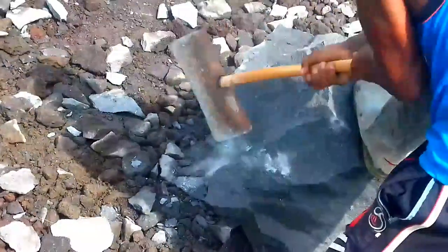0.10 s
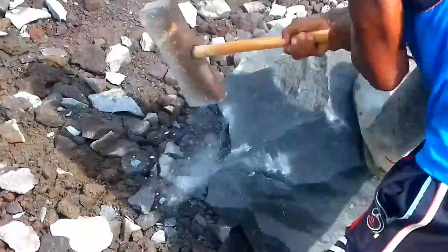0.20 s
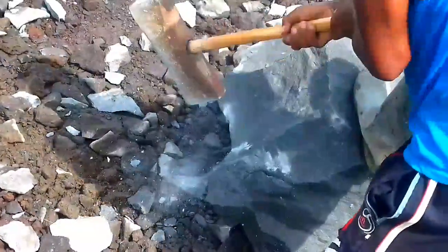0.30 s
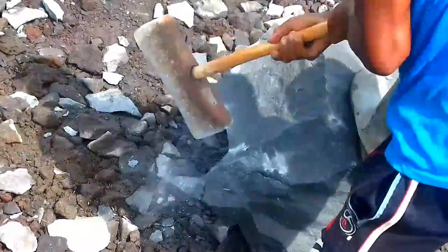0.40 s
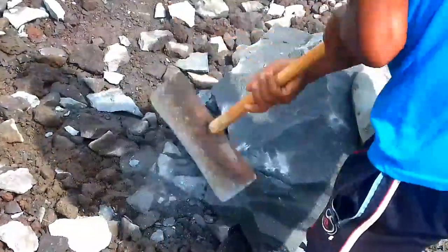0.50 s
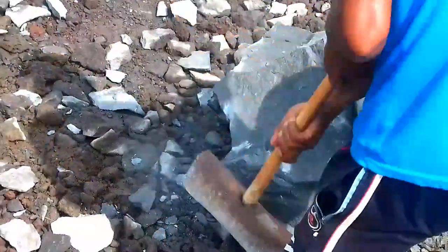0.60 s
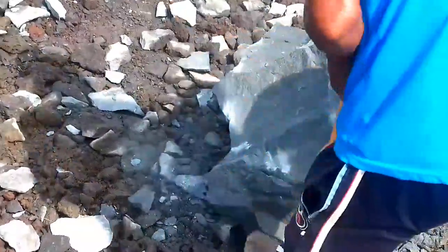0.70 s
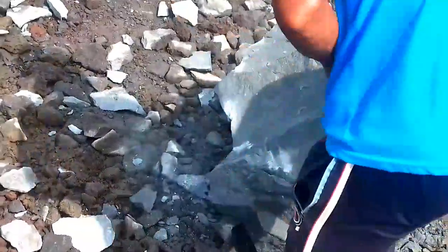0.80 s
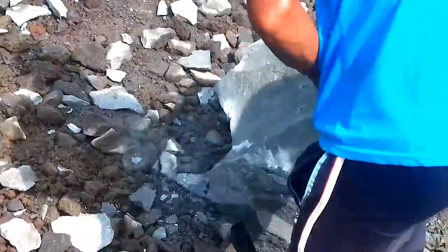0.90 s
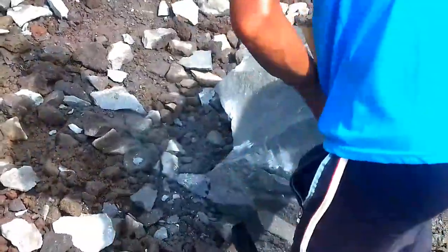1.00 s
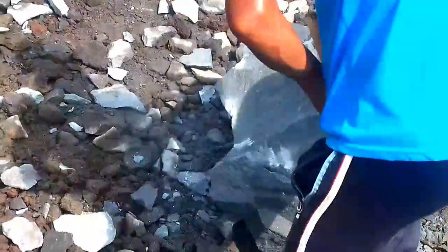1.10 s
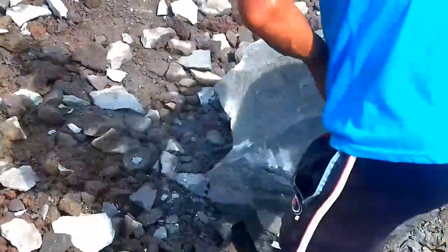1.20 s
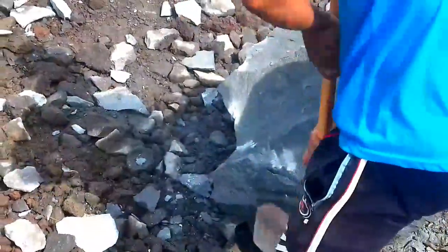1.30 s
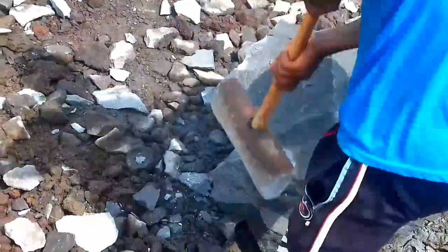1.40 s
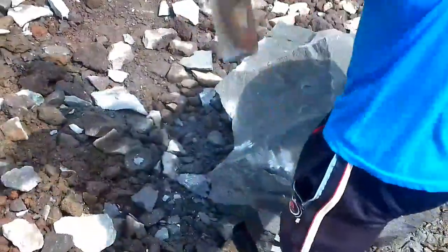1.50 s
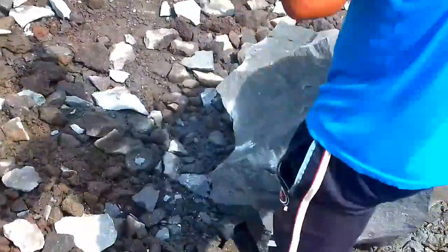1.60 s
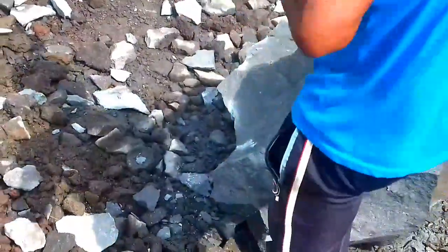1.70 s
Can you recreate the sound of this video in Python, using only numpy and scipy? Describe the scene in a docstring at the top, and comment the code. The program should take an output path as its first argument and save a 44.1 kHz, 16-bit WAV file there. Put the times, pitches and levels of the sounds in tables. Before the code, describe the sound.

A sledgehammer cracks once against a boulder, its steel head ringing on over faint engine drone

```python
"""Sledgehammer on a boulder

A sledgehammer strikes a boulder once in an open quarry, close enough to overload the microphone.
The stone cracks and thuds (noise bursts and short tones); the steel head rings on in longer tones,
wavering as it is swung away. Rubble and rock scatter the blow, grit rattles and a few chips land.
A distant engine drones under a wash of noise, fainter after the blow and swelling again at the end."""
import sys
import numpy as np
from scipy import signal
from scipy.fft import rfft, irfft
from scipy.io import wavfile
from scipy.ndimage import uniform_filter1d

SR = 44100
rng = np.random.default_rng(int(sys.argv[2]) if len(sys.argv) > 2 else 0)


def file_out(sig):
    """Save sig as 16-bit WAV at sys.argv[1]."""
    # one column per channel
    cols = np.atleast_2d(sig).T
    # limit, then scale
    lim = np.clip(cols, -1, 1)
    pcm = np.round(lim * 32767).astype(np.int16)
    wavfile.write(sys.argv[1], SR, pcm)


N = 74970  # length [samples]
BLOW_S = 0.2238  # moment of the blow [s]
THUD_RISE_S, THUD_T60_S = 0.0002, 0.04  # attack and time to fall 60 dB [s]

# tone of the rubble and grit: (frequency [Hz], relative level [dB])
RUBBLE_COLOUR = [(40, -6), (180, -2.5), (420, 3.5), (700, -1.5), (1500, 0), (2200, -6.5), (2900, -17.5),
                 (4300, -17), (6500, -41), (11000, -38.5), (15000, -53.5)]
# background gain over time: (time [s], engine gain [dB], wash and whine gain [dB])
BACKGROUND_GAIN = [(0, -0.5, -1), (0.162, -2, 3), (.215, -9, -8.5), (0.301, -10.5, -14), (0.499, -18, -16),
                   (0.749, -12, -15.5), (0.999, -13.5, -16.5), (1.25, -16.5, -20), (1.42, -10.5, -17.5),
                   (1.55, -8, -12), (1.659, -2.5, -6), (1.7, -2.5, -5)]


def amp(db):
    """Turns decibels into a gain."""
    return 10 ** (np.asarray(db) / 20)


def unit(x):
    """Scales a sound to an rms (average strength) of 1."""
    return x / np.sqrt(np.mean(x ** 2) + 1e-20)


def since(start_s):
    """Seconds gone by since start_s, zero before it."""
    return np.maximum(np.arange(N) / SR - start_s, 0)


def tint(x, colour):
    """Filters a sound by a table of levels over frequency, then scales it to rms 1."""
    hz, db = np.transpose(colour)
    log_freq = np.log(np.fft.rfftfreq(N, 1 / SR) + 1)  # the 1 avoids log of zero
    gain = amp(np.interp(log_freq, np.log(hz), db))
    return unit(irfft(rfft(x) * gain, N))


def noise(colour):
    """Random hiss with the given balance of low and high frequencies."""
    return tint(rng.standard_normal(N), colour)


def drift(rate_hz):
    """Slow random motion of rms 1: noise whose content fades out above about rate_hz."""
    freq = np.fft.rfftfreq(N, 1 / SR)
    return unit(irfft(rfft(rng.standard_normal(N)) * np.exp(-(freq / rate_hz) ** 2), N))


def struck(start_s, rise_s, t60_s):
    """Loudness curve of a struck thing: a smooth rise times a decay of 60 dB in t60_s."""
    t = since(start_s)
    return (1 - np.exp(-t / rise_s)) * np.exp(-np.log(1000) * t / t60_s)


def contact():
    """The steel face pushes on the stone: one swing of pressure, up and then below zero."""
    u = since(BLOW_S) / 0.00012  # time in units of 0.12 ms
    return amp(5) * u * (2 - u) * np.exp(-u)


def cracks():
    """The stone splinters in sharp noise bursts, each dying away within a few milliseconds."""
    # bursts: (time [s], relative level [dB], time to fall to 37 % [s])
    bursts = [(0.2237, -4, 0.0013), (0.2266, -2.5, 0.00064), (.229, -26.5, 0.00049), (0.229, -23, .0006),
              (0.2327, -10, 0.00076)]
    # tone of the bursts: (frequency [Hz], relative level [dB])
    crack_colour = [(100, -13.5), (900, -6.5), (2000, 8), (3100, -10), (4200, 8.5), (5500, -10.5),
                    (7800, -6), (9200, -20), (13500, -20), (15500, -26.5)]
    out = np.zeros(N)
    for start_s, db, decay_s in bursts:
        t = since(start_s)
        out += amp(db) * noise(crack_colour) * (t > 0) * np.exp(-t / decay_s)
    return amp(-8) * out


def boulder():
    """Stone damps its vibration fast: a short noisy thud and a set of brief tones."""
    # tone of the thud: (frequency [Hz], relative level [dB])
    thud_colour = [(30, -18), (120, -22.5), (220, -6), (330, -4.5), (460, 1), (640, -9), (950, -1),
                   (1550, -1), (2100, -2.5), (2700, -16.5), (4200, -17.5), (7000, -46), (16000, -61)]
    # tones of the stone: (frequency [Hz], level [dB], time to fall 60 dB [s])
    stone_tones = [ (410, -16, .075), (487, -13, .062), (206, -19.5, 0.083), (702, -24.5, 0.092),
                   (818, -23.5, 0.092), (948, -23.5, 0.06), (1080, -22, .08), (1266, -18.5, 0.098),
                   (1352, -23.5, 0.11), (1450, -22, 0.025), (1636, -15.5, 0.075), (1700, -23, 0.034),
                   (2105, -16.5, 0.025), (2580, -22.5, 0.051)]
    out = amp(-4) * noise(thud_colour) * struck(BLOW_S, THUD_RISE_S, THUD_T60_S)
    for k, (hz, db, t60_s) in enumerate(stone_tones):
        sign = (-1) ** k  # every other tone starts downwards
        tone = np.sin(2 * np.pi * hz * since(BLOW_S))
        out += sign * amp(db) * struck(BLOW_S, THUD_RISE_S, t60_s) * tone
    return out


def hammer():
    """The steel head rings in a few pure tones that swell and fade as it turns and lifts."""
    # tones of the steel: (frequency [Hz], relative level [dB], basic 60 dB decay time [s],
    # share of the waver [0-1])
    steel_tones = [ (3800, -21.5, 0.15, 0.7), (4600, -14, 0.23, 0.1), (5431, -20.5, 1.33, 1),
                   (8000, -35, .21, .2), (8415, -46, .36, .6), (9150, -41.5, 0.34, 0.8),
                   (14165, -51, .19, .3)]
    # waver of the ring, before smoothing and sharing: (time [s], gain [dB])
    waver = [(0.233, -7.5), (0.254, 9), (.28, -2), (.31, 4.5), (.336, -9.5), (.365, 2), (0.399, -5),
             (.425, -1), (0.447, -7), (0.474, -0.5), (0.577, -6.5), (0.602, -23.5), (0.632, -1.5), (.7, -2),
             (0.792, -10.5), (0.822, -30), (0.836, -4.5), (.88, 5), (.905, -12.5), (.935, 3.5),
             (1.012, -1.5), (1.05, -14.5), (1.18, -21.5), (1.35, -4), (1.45, -25)]
    rise_s, damping_db = 0.042, 449.5  # damping in dB per second squared, at no waver
    t = since(BLOW_S)
    waver_db = uniform_filter1d(np.interp(since(0), *np.transpose(waver)), size=500)
    out = np.zeros(N)
    for hz, db, t60_s, share in steel_tones:
        level_db = db + share * waver_db
        if t60_s < 1:  # shorter rings die faster and faster, most of all those that waver least
            level_db = level_db - damping_db * max(1 - share, 0) * t ** 2
        out += amp(level_db) * struck(BLOW_S, rise_s, t60_s) * np.sin(2 * np.pi * hz * t)
    return out


def ground():
    """The soil gives under the boulder with a low push, and loose grit rattles as random clicks."""
    push_hz, grains_per_s = 75, 230
    push = amp(-30) * struck(BLOW_S, 0.0011, 0.04) * np.sin(2 * np.pi * push_hz * since(BLOW_S))
    grains = rng.standard_normal(N) * (rng.random(N) < grains_per_s / SR)
    grit = amp(-27) * tint(grains, RUBBLE_COLOUR) * struck(BLOW_S, 0.0093, 0.091)
    return push + grit


def quarry():
    """Rubble and rock send the blow back as fading noise, from nearby and faintly from farther off."""
    # dull reflections off nearby rock: (delay [s], level [dB])
    reflections = [(.029, -26.5), (0.042, -31)]
    # tone of the reflections: (frequency [Hz], relative level [dB])
    reflection_colour = [(100, -9.5), (450, 1.5), (1300, 2), (2200, -11), (3500, -31), (16000, -70)]
    near = amp(-28) * struck(BLOW_S, 0.001, 0.14)
    far = amp(-40.5) * struck(BLOW_S, 0.036, 0.45)
    echoes = sum(amp(db) * struck(BLOW_S + delay_s, 0.00068, 0.024) for delay_s, db in reflections)
    return noise(RUBBLE_COLOUR) * (near + far) + noise(reflection_colour) * echoes


def chips():
    """Small fragments tick on the gravel: short noise bursts, each around its own pitch."""
    # landings: (time [s], level [dB], pitch [Hz])
    landings = [(0.335, -50.5, 4400), (0.611, -79.5, 6200), (0.74, -63.5, 5000), (0.828, -72, 5900),
                (1.141, -71, 4645), (1.39, -79, 4900), (1.68, -65, 4600)]
    rise_s, decay_s, width_octaves = 0.002, 0.012, 0.25
    freq = np.fft.rfftfreq(N, 1 / SR) + 1
    out = np.zeros(N)
    for start_s, db, hz in landings:
        band = np.exp(-(np.log2(freq / hz) / width_octaves) ** 2)
        tick = unit(irfft(rfft(rng.standard_normal(N)) * band, N))
        t = since(start_s)
        out += amp(db) * tick * np.minimum(t / rise_s, 1) * np.exp(-t / decay_s)
    return out


def engine():
    """A far engine hums at multiples of its unsteady turning rate, knocks once a turn and rumbles."""
    # hum tones: (multiple of the turning rate, level before the background gain [dB])
    orders = [(1, -54.5), (2, -50.5), (3, -62), (4, -49), (5, -81)]
    # tone of the knocks and rumble: (frequency [Hz], relative level [dB])
    rumble_colour = [(25, -23.5), (50, -5.5), (130, 0), (210, -0.5), (330, -4.5), (550, -15.5), (1200, -40),
                     (16000, -86.5)]
    turns_per_s, wobble = 49.65, 0.034  # wobble is an rms fraction of the rate
    turns = np.cumsum(turns_per_s * (1 + wobble * drift(21))) / SR
    hum = np.zeros(N)
    for multiple, db in orders:
        phase = multiple * turns + rng.random()
        hum += amp(db + 2.5 * drift(9.7)) * np.sin(2 * np.pi * phase)
    knock_shape = np.exp(-(turns % 1) / 0.15)  # falls to 37 % in 0.15 of a turn
    knocks = amp(-50.5) * tint(rng.standard_normal(N) * knock_shape, rumble_colour)
    rumble = amp(-49) * noise(rumble_colour)
    time_s, engine_db, _ = np.transpose(BACKGROUND_GAIN)
    return (hum + knocks + rumble) * amp(np.interp(since(0), time_s, engine_db))


def outdoor_wash():
    """A patchy wash of outdoor noise, with thin whines whose pitch trembles."""
    # tone of the wash: (frequency [Hz], relative level [dB])
    wash_colour = [(100, -10.5), (400, 2.5), (750, -0.5), (1400, 1), (2150, 0.5), (2750, -14.5),
                   (3200, -21), (3500, -13), (4600, -12.5), (6200, -28), (9000, -28), (15000, -27.5)]
    # whines: (middle frequency [Hz], level before the background gain [dB])
    whines = [(3440, -64.5), (3542, -70.5)]
    wash = amp(-46.5 + 1.25 * drift(40)) * noise(wash_colour)
    whine = np.zeros(N)
    for hz, db in whines:
        cycles = np.cumsum(hz + 12 * drift(60)) / SR  # trembles by 12 Hz rms
        whine += amp(db) * np.sin(2 * np.pi * cycles)
    time_s, _, wash_db = np.transpose(BACKGROUND_GAIN)
    return (wash + whine) * amp(np.interp(since(0), time_s, wash_db))


def width():
    """Faint hiss, opposite in left and right, with a burst at the blow: it makes the sound wider."""
    # tone of the hiss: (frequency [Hz], relative level [dB])
    hiss_colour = [(30, -0.5), (200, -1), (600, -5.5), (2000, -2.5), (5000, -16), (15000, -14.5)]
    level = amp(-78) + amp(-55.5) * struck(BLOW_S, THUD_RISE_S, THUD_T60_S)
    return noise(hiss_colour) * level


def scene():
    """Puts every source in the middle, with only a trace of stereo width."""
    blow = contact() + cracks() + boulder() + hammer()
    surroundings = ground() + quarry() + chips()
    mid = blow + surroundings + engine() + outdoor_wash()
    side = width()
    return np.array([mid + side, mid - side])


def record(dry):
    """The loud blow overloads the input, which cuts off the peaks; then the top treble is removed."""
    clip_level, edge_hz = 0.5, 15400  # full scale is 1
    clipped = np.clip(dry, -clip_level, clip_level)
    lowpass = signal.firwin(301, edge_hz, window=("kaiser", 9), fs=SR)
    return signal.oaconvolve(clipped, lowpass[None], "same", axes=1)


dry = scene()
out = record(dry)
file_out(out)
```